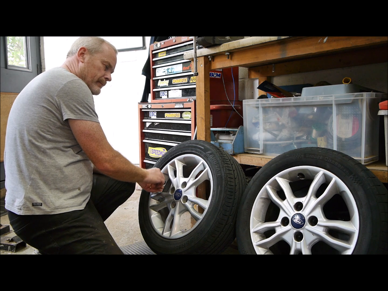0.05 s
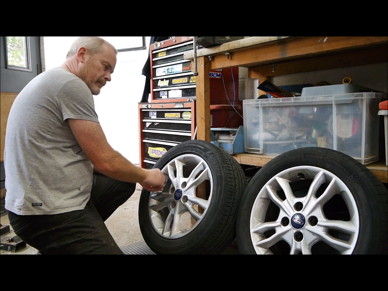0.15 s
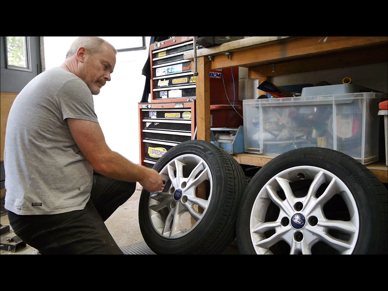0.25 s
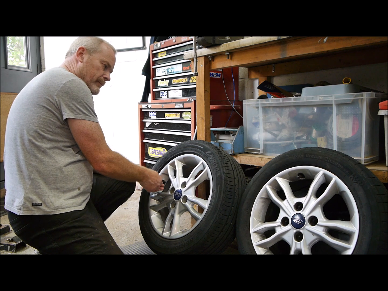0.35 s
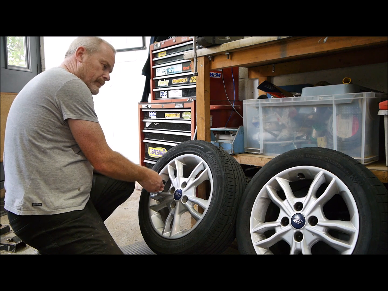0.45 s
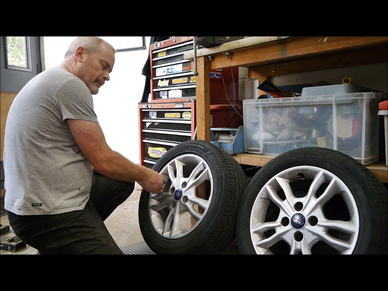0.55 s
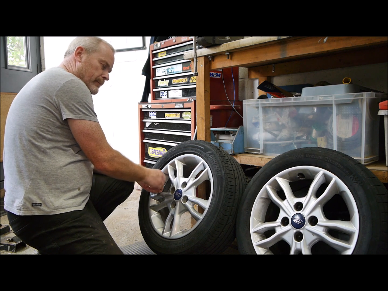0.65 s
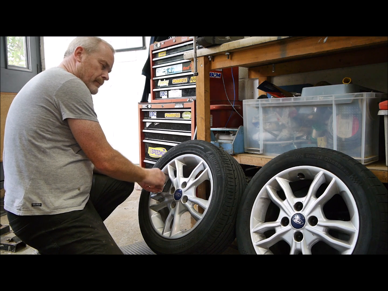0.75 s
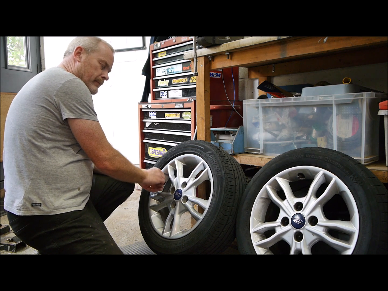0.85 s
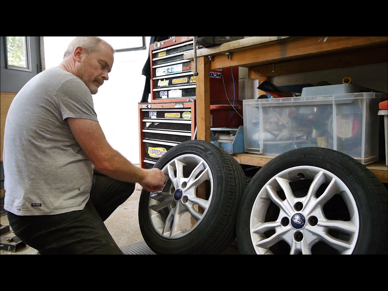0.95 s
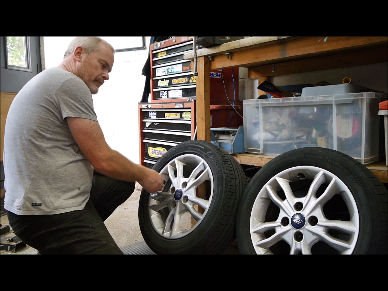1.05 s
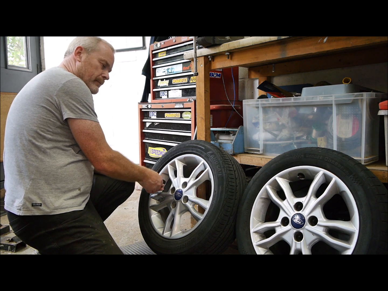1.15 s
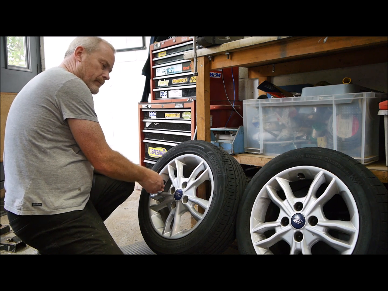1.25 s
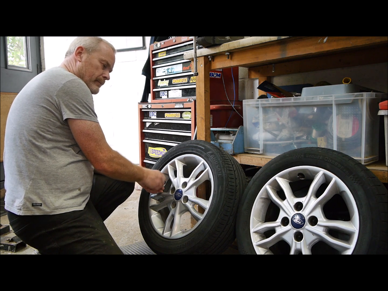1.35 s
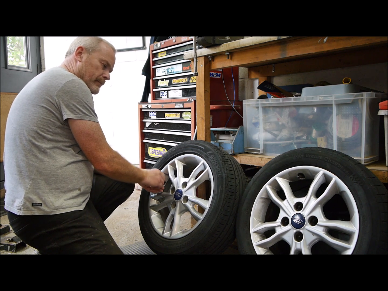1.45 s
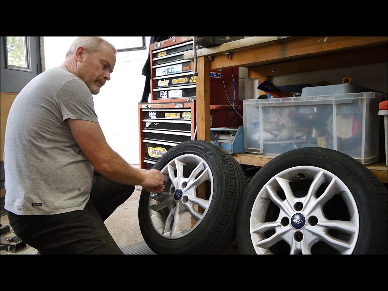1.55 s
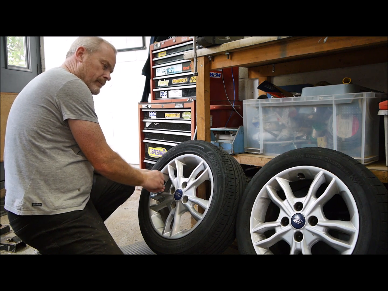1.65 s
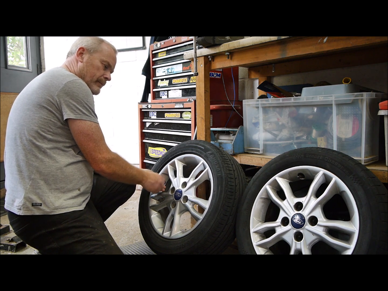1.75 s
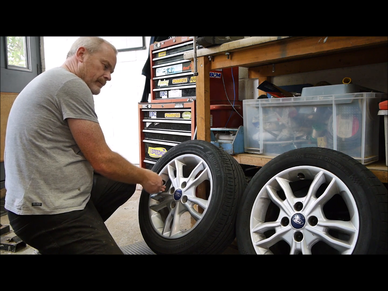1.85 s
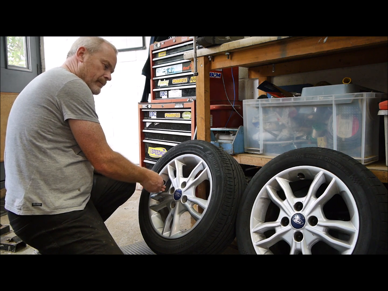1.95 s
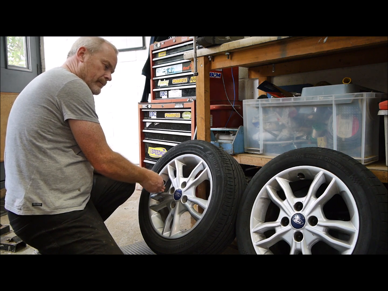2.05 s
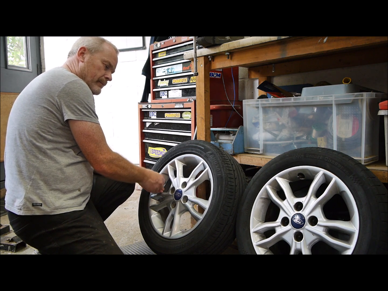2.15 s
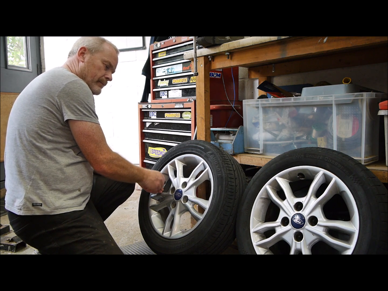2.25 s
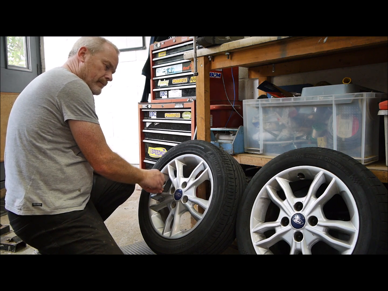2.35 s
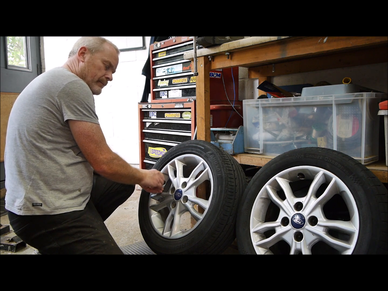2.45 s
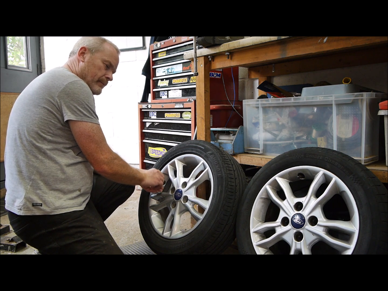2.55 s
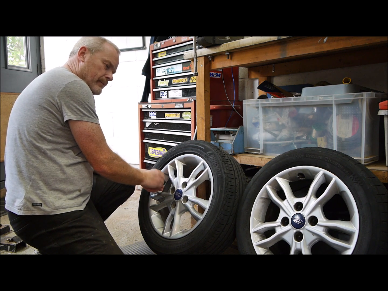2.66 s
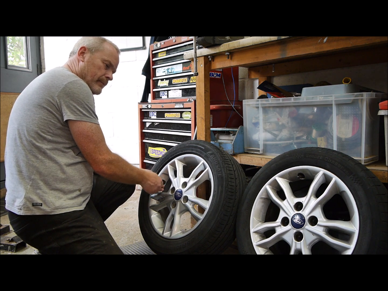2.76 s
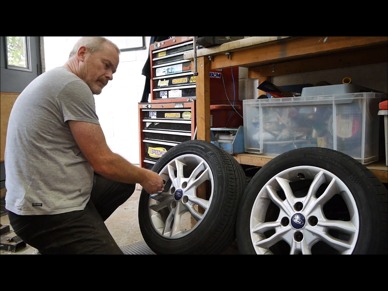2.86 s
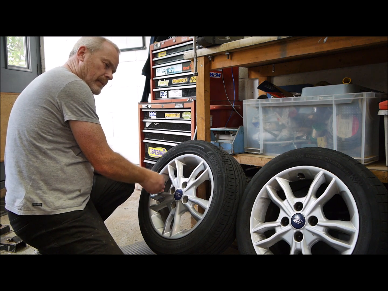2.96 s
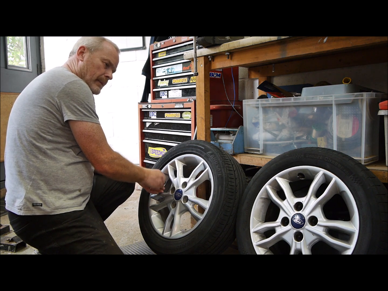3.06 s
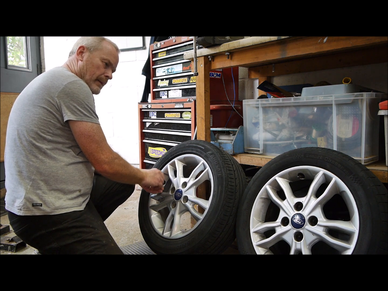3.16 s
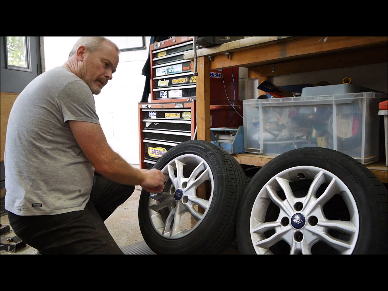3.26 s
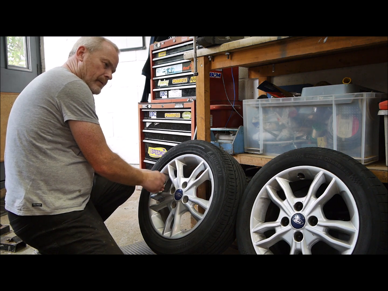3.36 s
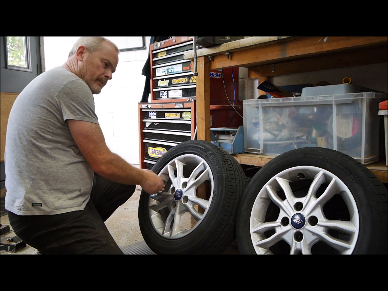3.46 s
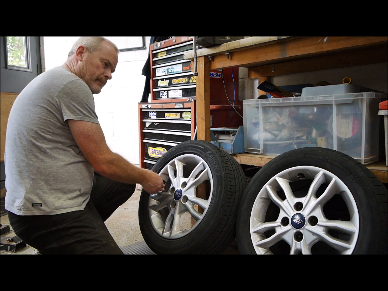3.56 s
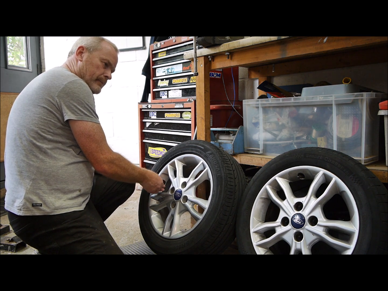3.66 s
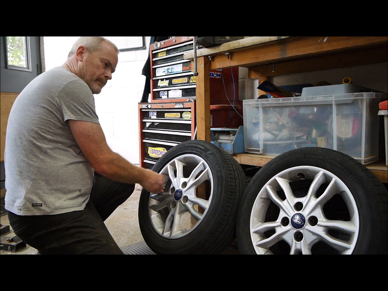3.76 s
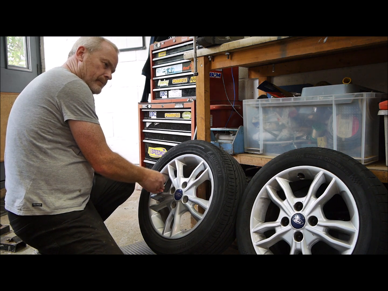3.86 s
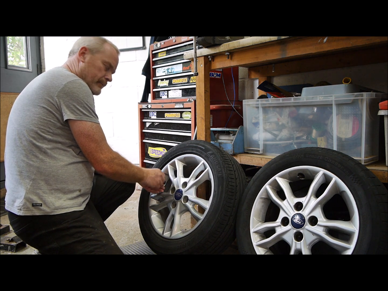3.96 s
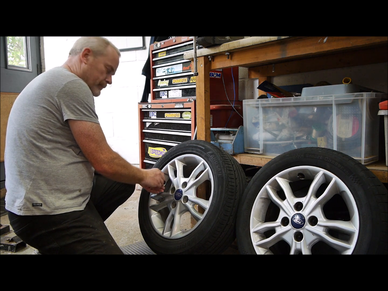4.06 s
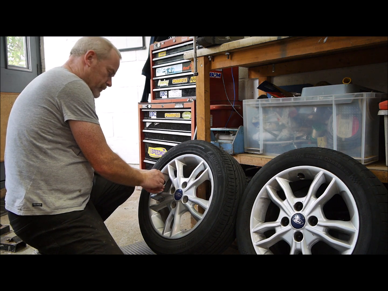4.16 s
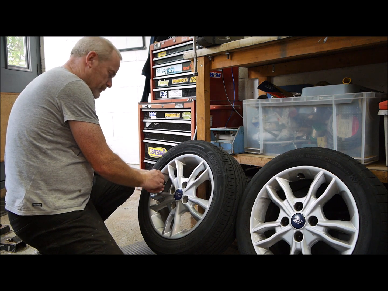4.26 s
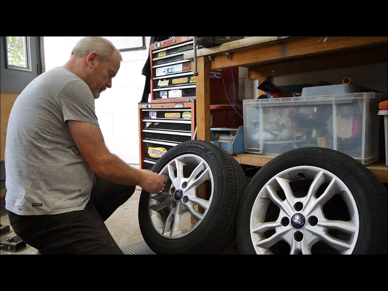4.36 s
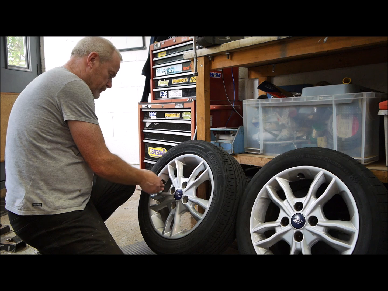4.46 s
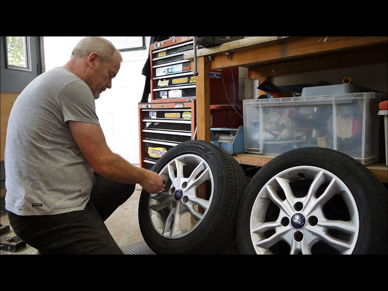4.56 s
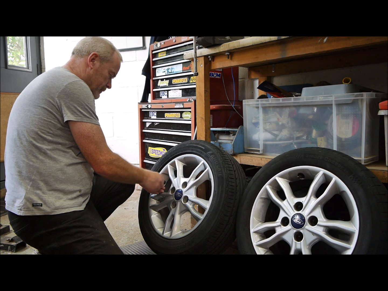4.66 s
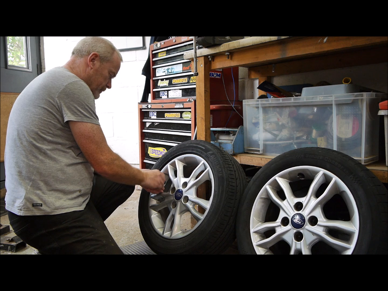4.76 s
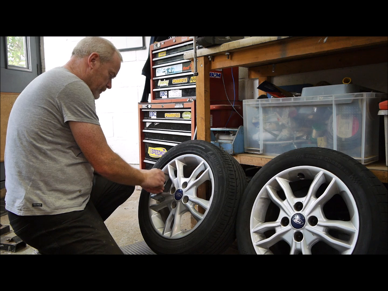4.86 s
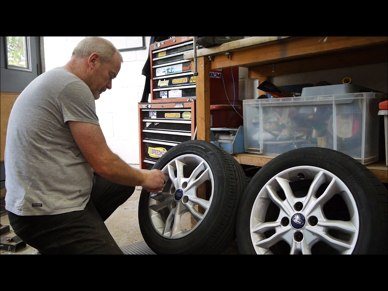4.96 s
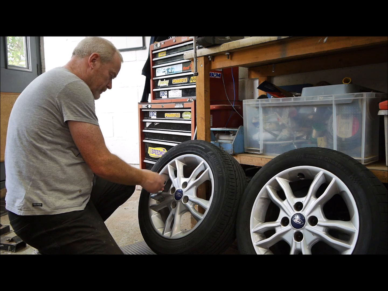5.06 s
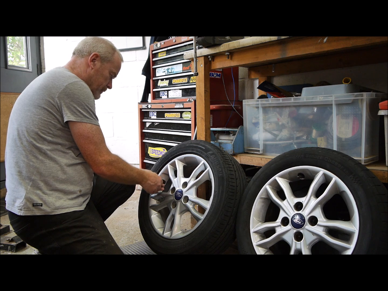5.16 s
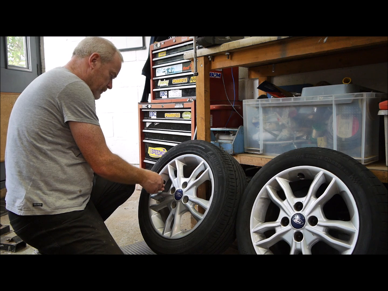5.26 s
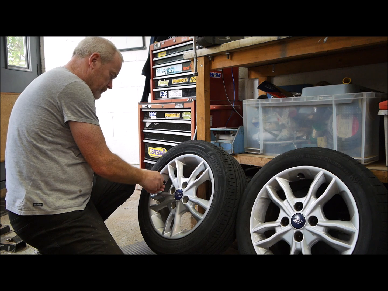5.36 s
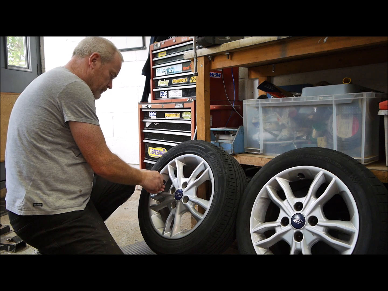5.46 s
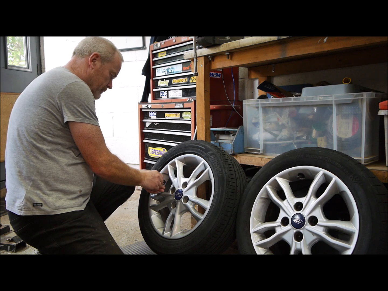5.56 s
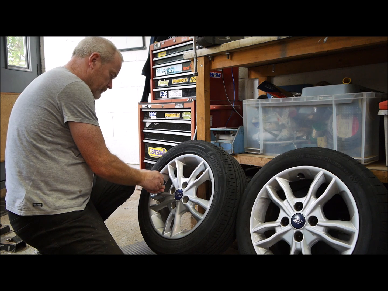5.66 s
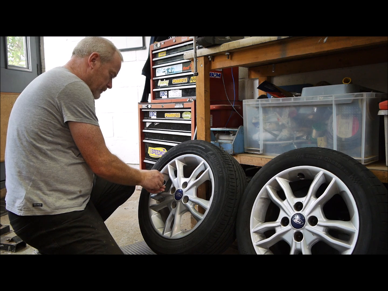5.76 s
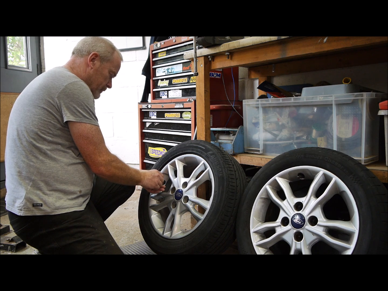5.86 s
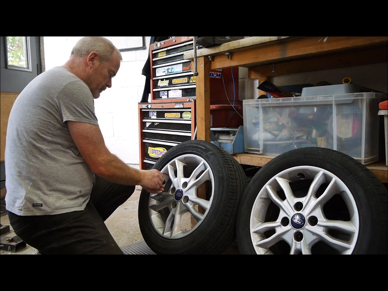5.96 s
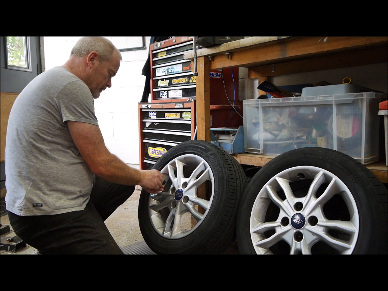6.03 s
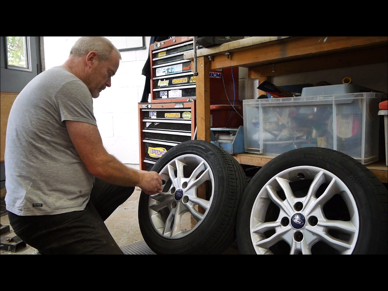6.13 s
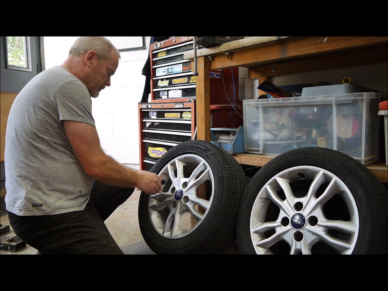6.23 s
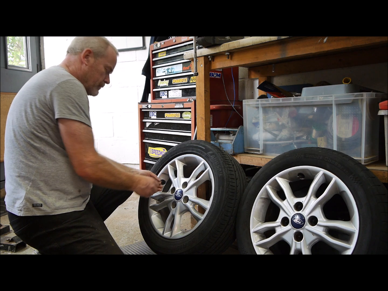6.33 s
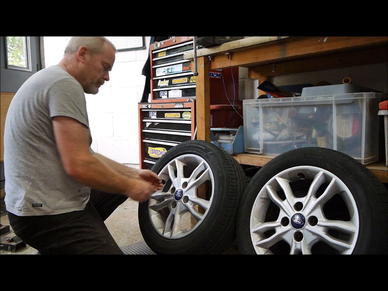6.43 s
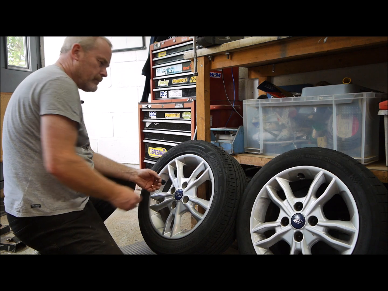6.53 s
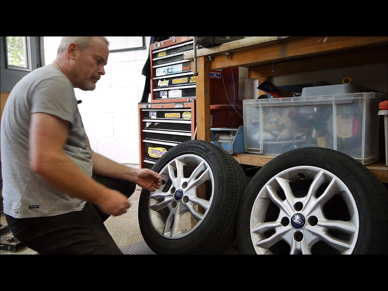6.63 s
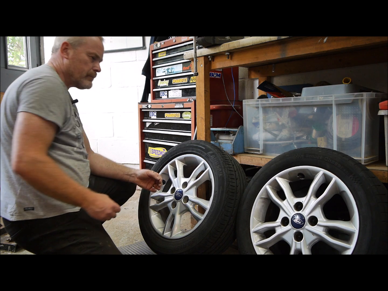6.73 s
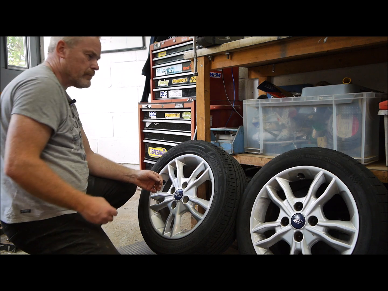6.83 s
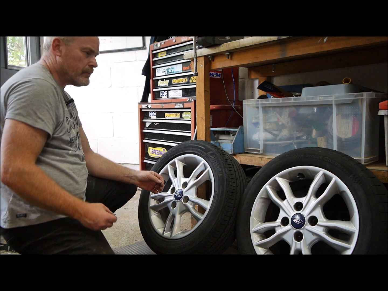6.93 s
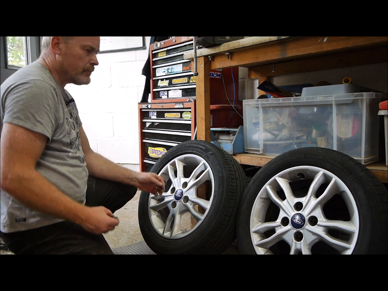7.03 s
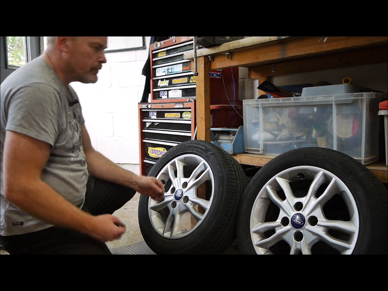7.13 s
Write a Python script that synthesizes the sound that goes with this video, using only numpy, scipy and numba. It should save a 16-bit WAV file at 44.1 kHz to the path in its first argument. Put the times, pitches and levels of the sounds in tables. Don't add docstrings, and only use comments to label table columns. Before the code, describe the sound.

In a small garage, close to the valve of a car tyre, a thin bright hiss is already running. It flutters and sputters as a tool turns, swelling around 0.5 s and dipping near 1.2 and 2.5 s, with short abrupt spits of air. A soft roar washes over fingers and wheel rim. Outside, a far engine drones low, revving faintly around 0.8, 2.2 and 3.7 s, then gone after 4.1 s; the building murmurs quietly. Tool knocks fall at 2.5 and 3.2 s, a hard bright one at 4.15 s, softer ones at 4.4 and 5 s. From 5.4 s sharp puffs and a hard knock at 5.5 s free the core, and air rushes out far louder. At 6.15 s a last puff gives way to a thin whistle near 4 kHz with bright overtones, chirping upward, then faltering and flaring over the strong hiss until the end at about 7.2 s.

```python
import sys
import numpy as np
from scipy import signal
from scipy.fft import rfft, irfft
from scipy.io import wavfile
from scipy.ndimage import uniform_filter1d
from numba import njit

SR = 44100
rng = np.random.default_rng(int(sys.argv[2]) if len(sys.argv) > 2 else 0)


def volts_from_db(level):
    exponent = np.asarray(level, float) / 20
    return 10 ** exponent


def materialize(psi):
    bounded = np.clip(np.atleast_2d(psi).T, -1, 1)
    quanta = np.round(bounded * 32767).astype(np.int16)
    wavfile.write(sys.argv[1], SR, quanta)


N = 317079

# pitch_hz, density_db (per Hz)
MURMUR = [(15, -30), (25, 3.5), (135, 2.5), (237, -33), (423, -4.5), (756, -14), (947, -5), (1860, -38),
          (2200, -4), (2860, -24), (4840, -120)]
MURMUR_DB = -53
ROOM_T60_S, ROOM_DB, WHISTLE_ROOM_DB = 0.23, -12, -7
# pitch_hz, level_db
ROOM_WIDTH = [(100, -1), (350, -1.5), (700, -4), (1400, 2), (2800, 5), (4500, 0), (9000, -1), (14000, 3)]
SIDE_DB, RIGHT_DB = -15, 0.26
# pitch_hz, level_db
MICROPHONE = [(60, -4.5), (1500, -1), (2000, -4), (2500, -3), (3300, -1.5), (3600, -2.5), (4000, -1),
              (15000, -0.5), (15550, -2.5), (15800, -7), (15980, -50)]

# start_s, pitch_hz
ENGINE_PITCH = [(0, 88.2), (.5, 97.8), (1.2, 101.8), (1.9, 105), (2.3, 111.6), (2.6, 100.5), (2.9, 91.3),
                (3.3, 84.2), (4.1, 84.5)]
# middle_s, half_length_s, level_db
ENGINE_REVS = [
    (0.814, 0.36, -52.5),
    (1.752, 0.18, -61),
    (2.17, .09, -58),
    (2.352, 0.044, -68),
    (2.596, .08, -58),
    (2.805, .05, -62),
    (3.15, 0.088, -68),
    (3.66, .2, -51),
]
IDLE_DB, IDLE_ENDS_S = -60, 4.1

# start_s, peak_db, pitch_hz, crack_db, tyre_thump_db
TOOL_KNOCKS = [
    (2.499, -34, 700, -17, -4),
    (3.2343, -21.5, 467, -19, -7.5),
    (4.1436, -10, 910, -14, -20.5),
    (4.4, -26.5, 600, -14, -11),
    (4.955, -34.5, 720, 0, -7),
    (5.053, -30.5, 910, -2, -1),
    (5.485, -14, 955, -23, -16.5),
]
RING_CYCLES, BOUNCE_S, RATTLE_DB, RATTLE_S = 4.7, 0.0023, -17.5, 0.019

# start_s, flow_db
AIR_FLOW = [(0, -32.5), (.3, -31.5), (.55, -26.5), (.9, -32.5), (1.15, -37.5), (1.8, -34.5), (2.15, -33.5),
            (2.5, -39.5), (2.62, -32), (3.4, -33), (4.1, -33), (4.7, -33), (5.0, -32), (5.36, -25.5),
            (5.46, -19), (6.1, -18.5), (6.25, -24.5), (7.19, -22.5)]
# middle_s, change_db, width_s
TOOL_SLIPS = [(0.076, -5, 0.016), (0.121, -10.5, 0.03), (0.195, -4, 0.029), (0.654, -5, 0.055),
              (0.859, -5, 0.015), (0.904, 1.5, 0.008), (0.994, -5, 0.0087), (1.373, 3.5, 0.036),
              (1.448, 5, 0.0059), (1.672, -4, 0.016), (1.961, 2.5, 0.054), (2.78, -3, 0.015),
              (2.899, 3, 0.024), (3.184, -2, 0.03), (3.263, -7.5, 0.012), (3.358, 4.5, 0.0076),
              (4.466, 3.5, 0.036), (4.72, 5.8, 0.011), (4.795, -7.5, 0.037), (4.925, -6.5, 0.011),
              (4.984, -9, 0.04), (5.024, -5.2, 0.01), (5.394, -6.5, 0.011), (5.503, 2, 0.022),
              (6.262, -3.5, 0.028), (6.526, -3.5, 0.025), (7.075, -3, 0.042), (7.165, -3, 0.021)]

# start_s, wash_db (relative to the flow), cupped_0_to_1, jet_on_rim_0_to_1
HAND_GRIP = [(0, -14.5, 0, 0.6), (.2, -12.5, 0.1, 0.9), (.55, -15, 0.94, 0.3), (1.1, -12, 0, 0.6),
             (1.35, -10, 0.85, 0), (1.9, -17, 1, 0.5), (2.6, -15, 0.24, 0.9), (2.85, -19, 0.18, 0.9),
             (3.05, -12.5, 1, 0.5), (3.3, -13, 0.99, .02), (3.6, -15, 1, 0), (3.78, -20, .3, 0.4),
             (4.2, -15.5, 0.05, 0.4), (5.2, -16.5, 0, 0.76), (5.5, -14.5, 0.4, 0.7), (6.4, -16, 0, 0.62),
             (6.9, -22.5, .5, 0.34), (7.19, -25.5, .1, 0.8)]
# middle_s, change_db, width_s
FINGER_MOVES = [(.25, -3, .04), (1.2, -4, 0.11), (2.38, -1, .05), (2.72, 5, 0.033), (3.5, -1, 0.03),
                (5.2, -1.5, 0.029), (5.49, 1.5, 0.018), (5.6, -2.5, 0.055), (5.74, 0.5, 0.037),
                (5.85, -2.5, 0.024), (6.31, -1, .03), (6.4, 3.5, 0.044)]
# middle_s, rise_db, width_s
RIM_GRAZES = [
    (.47, 9, 0.15),
    (2.98, 11, 0.037),
    (3.79, 9.5, 0.087),
    (5.85, 5, 0.2),
]
# pitch_hz, width_hz, level_db
HAND_MODES = [(546, 290, -3.5), (900, 455, -0.5), (1372, 670, -1)]
WASH_SLIP = 0.8
RIM_SPAN_DB, CUP_SPAN_DB = 7, 11.5
BUFFET_DB, BUFFET_PER_DB = -8, 0.6

# start_s, first_partial_db, second_partial_db
WHISTLE_LEVELS = [(6.16, -31, -22), (6.21, -30, -21), (6.24, -22.5, -24), (6.37, -26, -26),
                  (6.45, -20, -25.5), (6.62, -24.5, -32.5), (6.8, -24, -26.5), (7.09, -29.5, -24.5),
                  (7.17, -26.5, -25)]
# middle_s, change_db, width_s
FIRST_FALTERS = [(6.351, -6, 0.0052), (6.392, -8, .004), (6.519, -12, .004), (6.54, -13, .004),
                 (6.615, -7, .003), (6.635, 3.5, .012), (6.663, -14, 0.0044), (6.784, -8, .005),
                 (6.81, 6, .009), (6.826, -17, 0.0045), (6.882, -13, .003), (6.899, -11, .003),
                 (7.0, 6.5, 0.01), (7.044, -13, 0.0046), (7.16, 5.5, .015)]
# middle_s, change_db, width_s
SECOND_FALTERS = [(6.286, -10, 0.0065), (6.335, 5, 0.01), (6.377, -8, .005), (6.466, -4, .007),
                  (6.665, 5, 0.014), (6.7, -10, 0.0074), (6.897, -3, 0.013), (7.015, 4, .02),
                  (7.047, -9, 0.0046)]
WHISTLE_S, WHISTLE_HZ, CHIRP_HZ, CHIRP_S = 6.143, 4002, 330, .011
WHISTLE_SLIP = .6
THIRD_DB, THIRD_FADE_DB_S = -9, 4

# end_s, peak_db, swell_s
SEAL_PUFFS = [(.36, -36, .02), (.905, -30, 0.012), (1.455, -45, .015), (1.725, -31, 0.0095),
              (2.895, -30, 0.012), (3.31, -33, .02), (4.18, -25, 0.005), (4.73, -33, 0.0176),
              (5.056, -22, 0.0068), (5.18, -28, .01), (5.372, -42, .012), (5.43, -19.5, 0.015),
              (5.493, -11.5, 0.0099), (5.53, -23, 0.011), (5.562, -16, .015), (5.81, -17, 0.022),
              (6.152, -15, 0.017)]
# start_s, core_backed_out_0_to_1, mouth_uncovered_0_to_1
CORE_POSE = [(0, .05, 0.3), (.25, 0.2, 0.25), (.55, 0.5, 0.63), (.75, 0, 0.26), (1.25, 0.6, 0.43),
             (1.47, 0.2, 0.3), (1.8, .4, 0.51), (2.15, 0.46, 0.54), (2.7, 0.2, 0.37), (2.95, 0.62, 0.62),
             (3.4, 0.64, 0.34), (3.75, 0.77, .55), (4.3, 0.85, 0.36), (5.3, 0.93, 0.52), (5.5, 0.53, 0.13),
             (6.1, 0.99, 0.4), (6.3, 0.54, 0.61), (7.19, 0.68, 0.9)]
# start_s, tightness_0_to_1
LEAK_SLIT = [(0, 0.34), (.9, 0.2), (1.25, 0.63), (1.5, 0.33), (2.25, 0.8), (2.7, 0.45), (3.05, 1),
             (3.35, 0.33), (3.7, 0.78), (4.2, 0.44), (4.6, 0.76), (5.3, 0.78), (5.52, 0.14), (6.1, 0.6),
             (6.2, .25), (7.19, 0.55)]
# pitch_hz, width_hz, level_db
GAP_MODES = [(6760, 900, 0), (7700, 1400, -1.5)]
# pitch_hz, width_hz, level_db
FINE_MODES = [(12100, 1700, -3), (13100, 2300, -7), (14600, 3100, -1)]
STEM_HZ, STEM_RISE_HZ = 4770, 470
GAP_DB, GAP_SPAN_DB = -11.5, 14.5
MOUTH_DB, MOUTH_SPAN_DB = -8, 18.5
FINE_DB, FINE_SPAN_DB = -12, 15.5


def level(x, db):
    return x * volts_from_db(db) / np.sqrt(np.mean(x ** 2))


def curves(table):
    s, *columns = np.transpose(table)
    return [np.interp(np.arange(N) / SR, s, c) for c in columns]


def bells(rows):
    t = np.arange(N) / SR
    return sum(db * np.exp(-.5 * ((t - s) / width_s) ** 2) for s, db, width_s in rows)


def bursts(rows, cut_s=0.0013):
    t, out = np.arange(N) / SR, np.zeros(N)
    for s, db, swell_s in rows:
        out += volts_from_db(db) * np.exp(-np.abs(t - s) / np.where(t < s, swell_s, cut_s))
    return out


def walk(rate):
    hold = int(SR / rate)
    steps = np.repeat(rng.standard_normal(N // hold + 1), hold)
    return 1.4 * uniform_filter1d(uniform_filter1d(steps, hold), hold)[:N]


def colour(x, points):
    hz, db = np.transpose(points)
    f = np.fft.rfftfreq(N, 1 / SR) + 1
    return irfft(rfft(x) * volts_from_db(np.interp(np.log(f), np.log(hz), db)), N)


@njit
def svf(x, g, k):
    y, b, l = np.empty(len(x)), 0., 0.
    for i in range(len(x)):
        v = (b + g[i] * (x[i] - l)) / (1 + g[i] * (g[i] + k))
        b, l, y[i] = 2 * v - b, l + 2 * g[i] * v, k * v
    return y


def ring(hz, width, flicker_db=1.38):
    wander_hz = .012 * np.minimum(hz, 7000) * walk(4)
    g = np.tan(np.pi * np.clip(hz + wander_hz, 20, .45 * SR) / SR)
    k = width / np.mean(hz)
    once = svf(rng.standard_normal(N), g, k)
    return level(svf(once, g, k), 0) * volts_from_db(flicker_db * walk(14))


def group(modes):
    return level(sum(volts_from_db(db) * ring(hz, width) for hz, width, db in modes), 0)


def garage():
    mid, side = colour(rng.standard_normal((2, N)), MURMUR)
    return level(np.array([mid + .25 * side, mid - .25 * side]), MURMUR_DB)


def room(x):
    t = np.arange(SR // 3) / SR
    tails = rng.standard_normal((2, len(t))) * volts_from_db(-60 * t / ROOM_T60_S) * (t > .006)
    tails /= np.sqrt(np.sum(tails ** 2, axis=1, keepdims=True))
    return signal.fftconvolve(x[None], tails, axes=1)[:, :N]


def drone():
    t, hz = np.arange(N) / SR, curves(ENGINE_PITCH)[0]
    idle = volts_from_db(IDLE_DB) * (t < IDLE_ENDS_S)
    revs = sum(volts_from_db(db) * np.exp(-((t - s) / half_s) ** 4) for s, half_s, db in ENGINE_REVS)
    phase = 2 * np.pi * np.cumsum(hz * (1 + 0.037 * walk(20))) / SR
    return np.sqrt(2) * (idle + revs) * np.sin(phase)


def knocks():
    out, t = np.zeros(N), np.arange(SR // 12) / SR
    no_lows = signal.butter(2, 300, "high", fs=SR, output="sos")
    for s, db, hz, crack_db, thump_db in TOOL_KNOCKS:
        tap = np.sin(2 * np.pi * hz * t) * (1 - np.exp(-t / 0.00045)) * volts_from_db(-60 * t * hz / RING_CYCLES)
        grit = rng.standard_normal((2, len(t)))
        bounce = np.exp(-np.abs(t - BOUNCE_S) / 0.0015)
        crack = volts_from_db(crack_db) * uniform_filter1d(grit[0], size=4) * bounce
        rattle = volts_from_db(RATTLE_DB) * uniform_filter1d(grit[1], size=16) * np.exp(-t / RATTLE_S)
        wall = sum(a * np.sin(2 * np.pi * f * t) for f, a in [(340, 1), (135, 1.3), (620, 0.41)])
        thump = volts_from_db(thump_db - 60 * t / 0.029) * (1 - np.exp(-t / 0.0097)) * wall
        light = signal.sosfilt(no_lows, tap + crack + rattle)
        i = int(s * SR)
        out[i:i + len(t)] += volts_from_db(db + 10.0) * (light + thump)
    return out


def rush():
    flow_db = curves(AIR_FLOW)[0]
    wash_db, cupped, on_rim = curves(HAND_GRIP)
    rim_db = RIM_SPAN_DB * on_rim + 1.5 * walk(5.4)
    buffet_db = BUFFET_DB + 3 * cupped - BUFFET_PER_DB * (flow_db + 33.5) + 1.4 * walk(11)
    rim_edge = volts_from_db(0.44 * rim_db - 7.5 + bells(RIM_GRAZES)) * ring(2580, 370)
    rim_hiss = volts_from_db(0.75 * rim_db - 1.5) * ring(2980, 1370)
    buffet = volts_from_db(np.minimum(buffet_db, -2) + 0.5) * ring(255.0, 374)
    wash = group(HAND_MODES) + rim_edge + rim_hiss + buffet
    hollow_db = 1.9 * CUP_SPAN_DB * (np.minimum(cupped, 1) - 1) - 2 + 1.4 * walk(6)
    hollow = volts_from_db(hollow_db) * ring(723.0, 136)
    moves_db = WASH_SLIP * bells(TOOL_SLIPS) + bells(FINGER_MOVES)
    flutter_db = 0.92 * walk(20) + 0.98 * walk(7)
    return volts_from_db(flow_db + wash_db + moves_db + flutter_db) * (wash + hollow)


def whistle():
    since = np.clip(np.arange(N) / SR - WHISTLE_S, 0, None)
    hz = WHISTLE_HZ - CHIRP_HZ * np.exp(-since / CHIRP_S) + 7 * walk(15)
    first_db, second_db = curves(WHISTLE_LEVELS) + np.array([bells(FIRST_FALTERS), bells(SECOND_FALTERS)])
    third_db = second_db + THIRD_DB - THIRD_FADE_DB_S * since
    phase = 2 * np.pi * np.cumsum(hz * (1 + .0025 * walk(300))) / SR
    out = 0
    for k, db in enumerate([first_db, second_db, third_db], start=1):
        waver = 1 - .6 * np.clip(walk(110) - .3, 0, 1) + .15 * walk(60)
        breaks = volts_from_db(-2.5 * np.clip(walk(60) - .4, 0, 1.2))
        tone = np.sqrt(2) * waver * breaks * np.sin(k * phase)
        skirt = volts_from_db(-11.0) * ring(k * hz + 100, 690)
        out = out + volts_from_db(db + 4.0) * (tone + skirt)
    onset = 1 - np.exp(-since / CHIRP_S)
    return out * onset * volts_from_db(WHISTLE_SLIP * bells(TOOL_SLIPS))


def puffs():
    spit = ring(5030, 2100) + volts_from_db(3.0) * ring(6840, 3500)
    spit = spit + volts_from_db(-6) * ring(12500, 6000) + volts_from_db(-4.5) * ring(3200, 2300)
    return bursts(SEAL_PUFFS) * spit * volts_from_db(-5.5)


def jet():
    flow_db = curves(AIR_FLOW)[0] + bells(TOOL_SLIPS)
    backed_out, uncovered = curves(CORE_POSE)
    stem_hz = STEM_HZ + STEM_RISE_HZ * backed_out + 60 * walk(8)
    gap_db = GAP_DB + GAP_SPAN_DB * backed_out + 1.06 * walk(12)
    mouth_db = MOUTH_DB + MOUTH_SPAN_DB * uncovered + 0.73 * walk(12)
    fine_db = FINE_DB + FINE_SPAN_DB * curves(LEAK_SLIT)[0] + 1.3 * walk(11)
    lower_db = -1.5 - uniform_filter1d(stem_hz - 4900, SR // 3) / 70
    ridge = volts_from_db(.35 * (flow_db + 28)) * ring(uniform_filter1d(stem_hz, SR // 5), 750)
    stem = ridge + volts_from_db(lower_db) * ring(4350, 870) + volts_from_db(-1.0) * ring(5670, 1450)
    stem /= np.sqrt(uniform_filter1d(stem ** 2, SR // 4))
    narrow, broad = volts_from_db(1.89 * mouth_db - 5.5), volts_from_db(0.8 * mouth_db - 3.5)
    mouth = narrow * ring(8965, 1600) + broad * ring(10230, 3660)
    body = stem + volts_from_db(gap_db) * group(GAP_MODES) + mouth + volts_from_db(fine_db) * group(FINE_MODES)
    body /= np.sqrt(1 + volts_from_db(2 * gap_db) + narrow ** 2 + broad ** 2 + volts_from_db(2 * fine_db))
    flutter = volts_from_db(0.49 * walk(25) + 0.93 * walk(150))
    return volts_from_db(flow_db) * flutter * body


def scene():
    air = jet() + puffs() + rush() + knocks() + drone()
    tone = whistle()
    near = air + tone
    wet, wide = room(air + volts_from_db(WHISTLE_ROOM_DB) * tone)
    mid = near + volts_from_db(ROOM_DB) * wet
    side = volts_from_db(SIDE_DB) * colour(wide, ROOM_WIDTH)
    loud = np.sqrt(uniform_filter1d(near ** 2, SR // 4))
    duck = (1 + loud / volts_from_db(-19.5)) ** -1.3
    return np.array([mid + side, volts_from_db(RIGHT_DB) * (mid - side)]) + duck * garage()


def roll_off(x):
    return signal.sosfilt(signal.butter(12, 16400, fs=SR, output="sos"), x)


def record(dry):
    mix = colour(dry, MICROPHONE)
    return roll_off(mix)


dry = scene()
out = record(dry)
materialize(out)
```